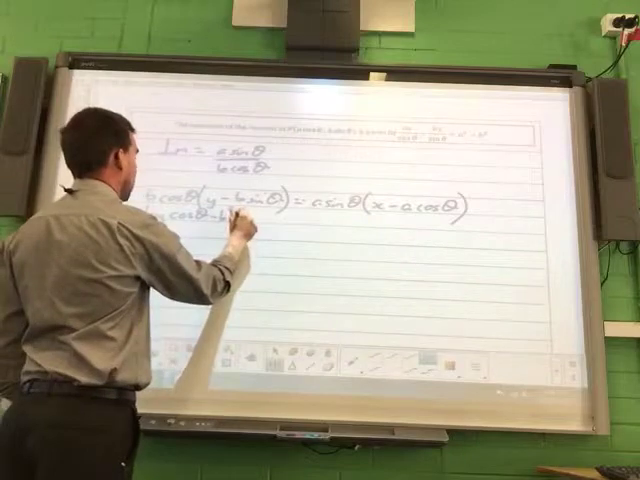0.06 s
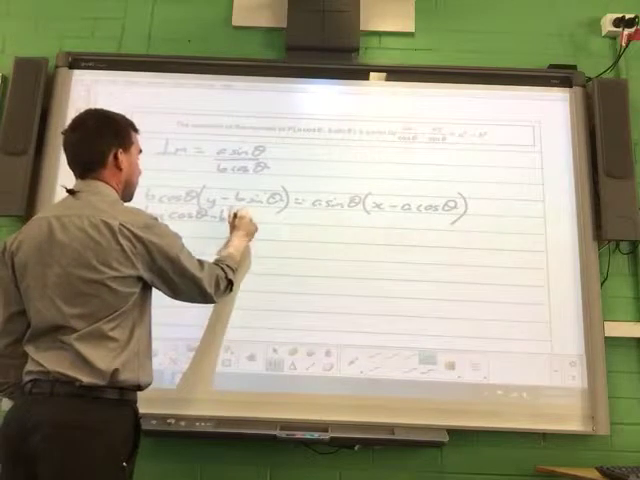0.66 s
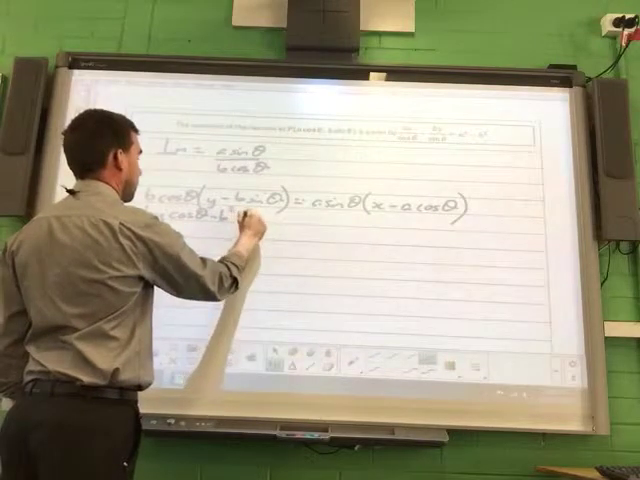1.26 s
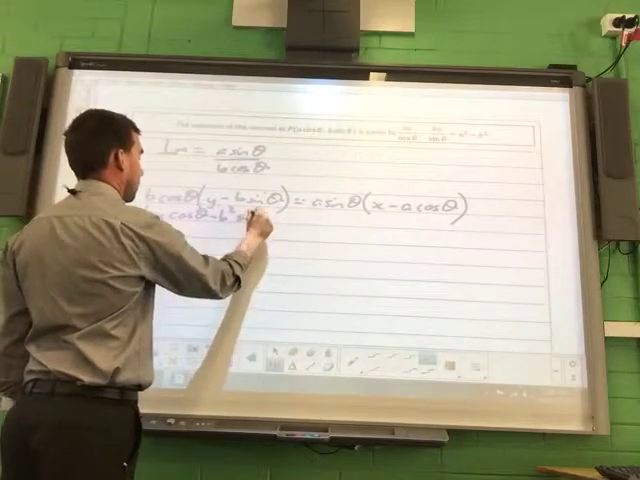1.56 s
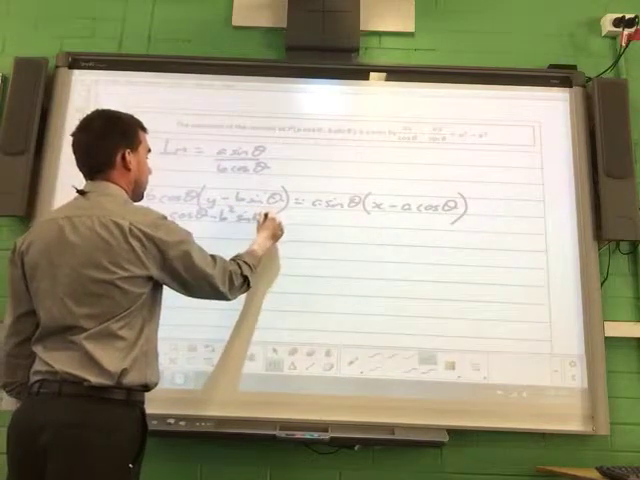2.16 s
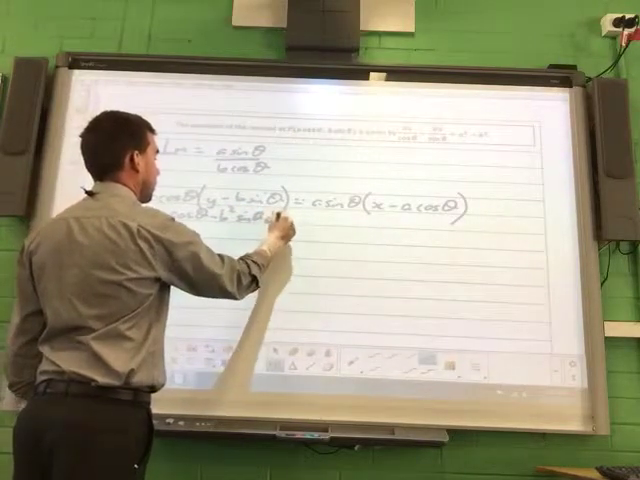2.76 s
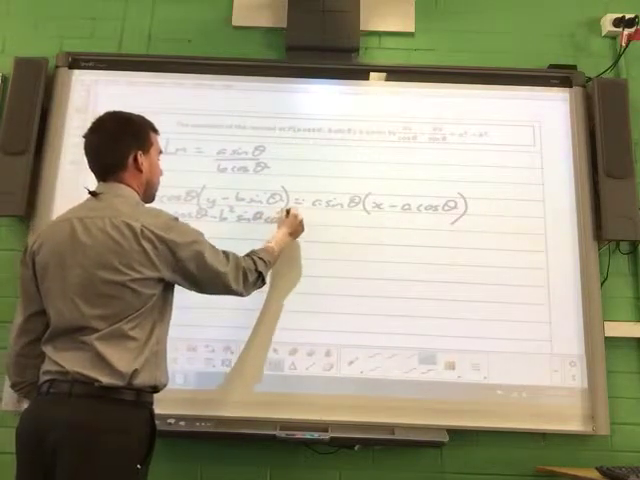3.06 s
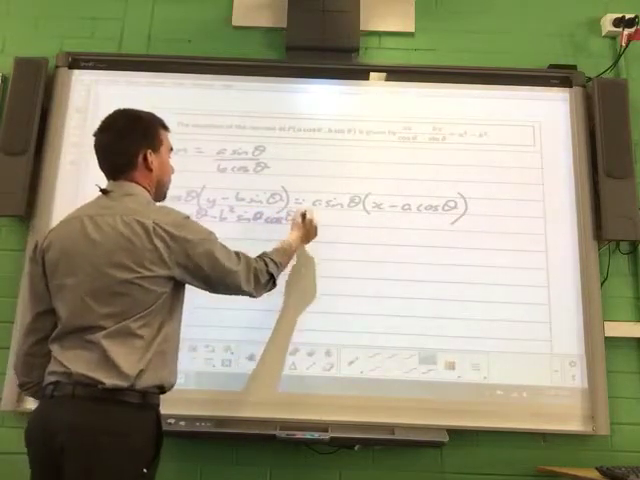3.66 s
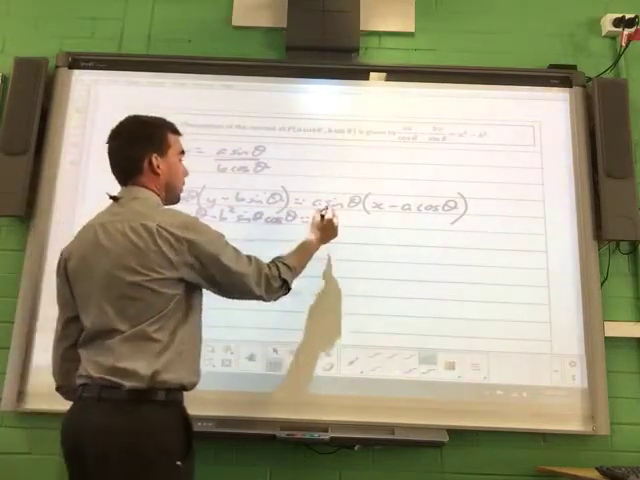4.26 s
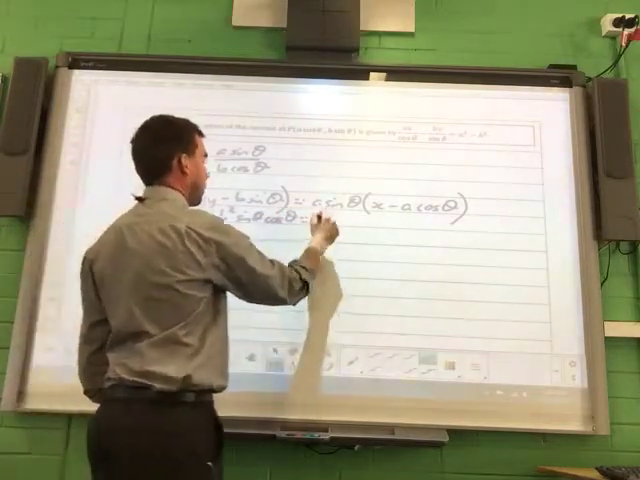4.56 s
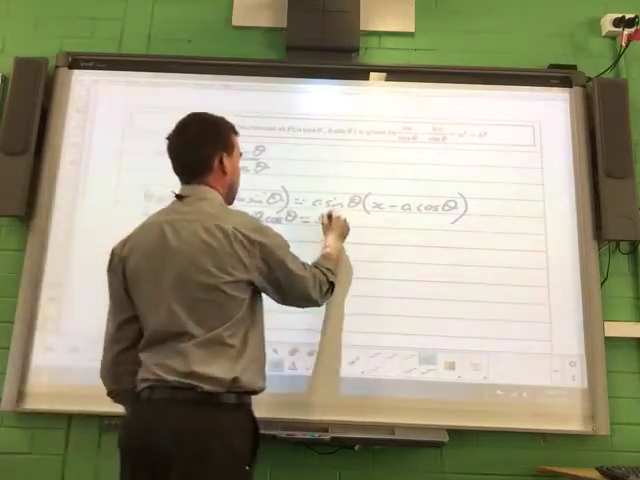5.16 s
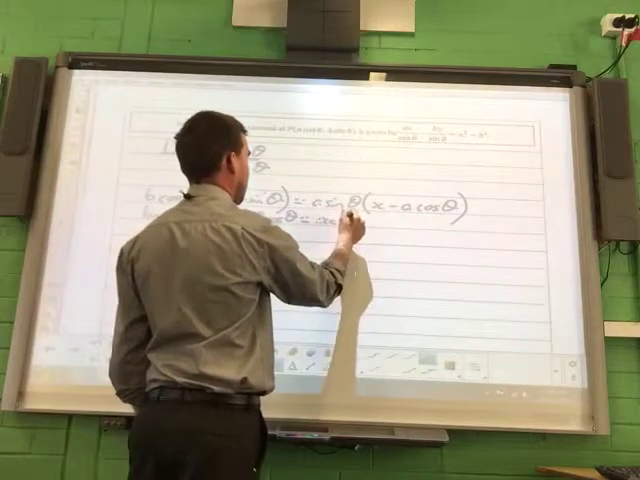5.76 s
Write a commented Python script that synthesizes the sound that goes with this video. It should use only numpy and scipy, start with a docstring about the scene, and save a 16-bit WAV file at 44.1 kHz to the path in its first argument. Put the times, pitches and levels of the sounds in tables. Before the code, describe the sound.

A hard pen knocks irregularly on a hollow whiteboard, with tiny ticks and faint slides, over a soft projector fan.

```python
"""Pen on a hollow whiteboard

A man writes with a hard pen on a large hollow whiteboard in a quiet classroom, a projector fan overhead.
Each touch of the nib knocks the panel: a bending wave spreads, returns from the frame and rings on in
the room. The tip ticks and pings the pen's barrel, then slides faintly over the surface between knocks."""
import sys
import numpy as np
from scipy import signal
from scipy.fft import rfft, irfft, next_fast_len
from scipy.io import wavfile

SR = 44100
rng = np.random.default_rng(int(sys.argv[2]) if len(sys.argv) > 2 else 0)


def generate_wav(sig):
    """Save sig (samples, or channels by samples) to the path in sys.argv[1] as 16-bit PCM at SR."""
    pcm = np.round(np.clip(np.atleast_2d(sig).T, -1, 1) * 32767).astype(np.int16)
    wavfile.write(sys.argv[1], SR, pcm)


N = 255780
SIZE = 49152  # samples in the buffer for one knock
HZ = np.fft.rfftfreq(SIZE, 1 / SR)
AGE = np.arange(SIZE) / SR  # seconds since the touch
BARREL_HZ = 4760

# Fan and room air. Each row: frequency in Hz, relative level in dB.
FAN_COLOUR = [(20, -26), (33, -33), (45, -9.5), (58, 4.5), (80, -13), (115, -2.5), (145, -9), (195, -7),
              (300, -10), (500, -18), (850, -17.5), (1600, -24.5), (4000, -29.5), (6500, -31),
              (10400, -37.5), (12000, -37), (15300, -39.5)]
# Pen-downs. Each row: start in seconds, knock gain in dB, brightness in dB per octave, click gain in dB.
TOUCHES = [(0.7643, -29, -3.5, -86), (1.1345, -25.5, -0.5, -70.5), (1.2838, -30, -5.5, -86),
           (1.4258, -26.5, -6, -73), (1.718, -26, -.5, -72.5), (2.2615, -24.5, -0.5, -76),
           (2.5024, -26, -1.5, -74), (2.8146, -31, -7, -80), (3.2674, -24, -0.5, -77),
           (3.9612, -21.5, 2, -67.5), (4.1509, -21.5, 2, -72), (4.9823, -31.5, -3.5, -75),
           (5.4073, -23, 0.1, -65.5), (5.7041, -26, 0.1, -86)]
# The panel's first push. Each row: frequency in Hz, relative level in dB.
PUSH_COLOUR = [(40.0, -66.5), (105.0, -22), (160.0, 1), (270.0, 4), (390.0, -2.5), (650.0, -6.5),
               (800.0, -20.5), (1020.0, -16.5), (1300.0, -42), (2000.0, -48.5), (3200.0, -64),
               (8000.0, -74)]
# Waves back from the frame. Each row: delay at time zero in ms, drift in ms per second, signed gain.
FRAME_RETURNS = [(5.04, .37, -0.78), (5.52, -0.061, 0.98), (8.27, 0.11, -1.4), (9.42, -0.36, 0.73),
                 (13.19, -0.069, 0.84), (16.79, -0.385, 0.47)]
# The frame's dry rattle. Each row: frequency in Hz, relative level in dB.
RATTLE_COLOUR = [(500, 1.5), (1000, 6.5), (1300, 6.5), (1700, 2.5), (2100, -3), (2600, -3), (3200, -17),
                 (4800, -16), (7000, -31), (9500, -37), (11500, -57), (15000, -59)]
# Ring of panel and frame, plus one low, long-lasting room boom.
# Each row: frequency in Hz, relative level in dB, 60 dB decay in seconds.
RING_MODES = [(95.5, -37, 3.4), (165, -7.5, 0.57), (236.8, -13.5, 0.25), (265.5, -10.5, 0.66),
              (289.2, -14, 0.73), (334, -4, 0.44), (364.5, -7, 0.47), (420, -19.5, 0.32), (445, -5.5, 0.41),
              (520.8, -11.5, 0.19), (548, -16.5, 0.48), (587, -24, 0.78), (625, -16.5, 0.48),
              (653.3, -4, 0.15), (763, -18, 0.26), (861, -9.5, 0.18), (907, -20, 0.37), (966, -34, .38),
              (1015, -28, 0.39), (1555, -26, 0.18), (1830, -39, 0.2)]
# Sound scattered round the room. Each row: frequency in Hz, relative level in dB.
TAIL_COLOUR = [(50, -26.5), (115, -9.5), (160, -6), (220, -4.5), (330, 1.5), (480, -2.5), (650, -5),
               (780, -9), (1020, -15.5), (1200, -22.5), (1800, -26.5), (2600, -35), (3300, -36.5),
               (8500, -52.5), (12000, -64)]
# The room's reverb time. Each row: frequency in Hz, 60 dB decay in seconds.
TAIL_DECAY = [(100, 0.76), (280, 0.76), (600, 0.56), (1000, 0.48), (2000, 0.37), (8000, 0.42)]
# What the panel throws at the far walls. Each row: frequency in Hz, gain in dB.
ECHO_COLOUR = [(100, -10), (200, -1.5), (330, -8), (480, -10.5), (700, -37.5), (1500, -1.5)]
# Slapback off the walls. Each row: delay in seconds, gain in dB.
WALL_ECHOES = [(.042, -9), (.054, -21), (.079, -4)]
# The tip's dry tick and rasp. Each row: frequency in Hz, relative level in dB.
NIB_COLOUR = [(1500, -6.5), (2400, 0), (3300, -1), (4200, 4), (5100, -6), (6200, -2.5), (10000, -31),
              (14000, -32)]
# Letters, each written without lifting the nib. Each row: start in seconds, length in seconds, gain in dB.
LETTER_SLIDES = [(.84, .2, -83), (1.749, .4, -76.5), (2.27, .2, -82), (2.515, .2, -82.5),
                 (2.816, .2, -80.5), (3.3, .4, -75), (4.003, .1, -77), (4.14, .1, -84), (4.998, .2, -77.5),
                 (5.432, .1, -80), (5.721, .1, -78)]
# The nib's hiss on the smooth surface. Each row: frequency in Hz, relative level in dB.
HISS_COLOUR = [(3000, -28), (7000, 3.5), (10400, 1), (12000, 5), (15000, 1.5)]


def amp(db):
    """Decibels to gain."""
    return 10 ** (np.asarray(db) / 20)


def unit(x):
    """Scaled to rms 1."""
    return x / np.sqrt(np.mean(x ** 2) + 1e-20)


def along(points, hz):
    """A curve of (Hz, value) points, read on a log frequency axis."""
    freqs, values = np.transpose(points)
    return np.interp(np.log(hz + 1), np.log(freqs + 1), values)


def noise(colour, size):
    """Noise of rms 1 with the given colour."""
    gains = amp(along(colour, np.fft.rfftfreq(size, 1 / SR)))
    return unit(irfft(rfft(rng.standard_normal(size)) * gains, size))


def causal_eq(db):
    """The minimum-phase response with these gains."""
    cepstrum = irfft(np.log(amp(db)))
    cepstrum[1:SIZE // 2] *= 2
    cepstrum[SIZE // 2 + 1:] = 0
    return np.exp(rfft(cepstrum))


def delay(seconds):
    """The frequency response of a travel time."""
    return np.exp(-2j * np.pi * HZ * seconds)


def swell(rise_s, t60):
    """An envelope that builds up, then dies away."""
    return (1 - np.exp(-(AGE / rise_s) ** 2)) * amp(-60 * AGE / t60)


def add(track, start_s, sound):
    """Mix a sound into the track."""
    part = track[max(round(start_s * SR), 0):][:len(sound)]
    part += sound[:len(part)]


def fan_and_hum(fan_db=-66, hum_hz=96.5, crest_s=0.56, period_s=1.377):
    """The bed: the fan's steady rush and a low, wavering hum that swells and fades."""
    t = np.arange(N) / SR
    waver = 0.82 * noise([(1, -18), (4, 11), (12, -51), (50, -120)], N)
    hum = np.sqrt(2) * np.sin(2 * np.pi * hum_hz * t + waver)
    hum_db = -75.5 + 8.5 * np.cos(2 * np.pi * (t - crest_s) / period_s)
    return amp(fan_db) * noise(FAN_COLOUR, N) + amp(hum_db) * hum


def bending_wave(travel_s=0.0005):
    """Spectrum of the panel's push: highs outrun lows, so it is a short falling chirp."""
    slowness = np.sqrt(1000 / (HZ + 1))  # relative to 1 kHz
    wave = causal_eq(along(PUSH_COLOUR, HZ)) * delay(2 * travel_s * slowness)
    return wave / np.abs(irfft(wave)).max()


def frame_paths(time_s):
    """The direct wave plus its returns from the frame, which shift as the pen moves steadily right."""
    return 1 + sum(gain * delay((ms + drift * time_s) / 1000) for ms, drift, gain in FRAME_RETURNS)


def contact(time_s, db, brightness, tilt_hz=550, boom_hz=230, hollow_hz=700, hard_knock_db=-22.5):
    """EQ of one touch: a shorter contact is brighter, and force and spot set the boom and hollow tone."""
    tilt = brightness * np.log2(1 + np.minimum(HZ / tilt_hz, 5) ** 2) / 2
    boom_db = -1.5 - 0.5 * (db - hard_knock_db)  # harder knocks boom less
    boom = boom_db / (1 + (HZ / boom_hz) ** 4)
    hollow_db = 2.5 - 0.35 * time_s  # fades as the pen nears the middle of the board
    hollow = hollow_db * np.exp(-(2 * np.log2((HZ + 1) / hollow_hz)) ** 2)
    return causal_eq(tilt + boom + hollow)


def mode_ring(spread_db=0.5):
    """The board's modes and one low room mode ring at slightly new strengths for each spot struck."""
    ring = np.zeros(SIZE)
    for hz, db, t60 in RING_MODES:
        envelope = amp(db + spread_db * rng.standard_normal() - 60 * AGE / t60)
        ring += envelope * np.sin(2 * np.pi * (hz * AGE + rng.random()))
    return ring


def room_tail():
    """A diffuse wash in which each frequency dies at its own speed."""
    hz, t, bands = signal.stft(noise(TAIL_COLOUR, SIZE), SR, nperseg=512)
    decay = amp(-60 * t / along(TAIL_DECAY, hz)[:, None])
    return signal.istft(bands * decay, SR, nperseg=512)[1][:SIZE]


def knocks(fresh_share=0.25):
    """Each pen-down sends a wave over the panel, which rattles the frame, rings and fills the room."""
    track, wave, shared_tail = np.zeros(N), bending_wave(), room_tail()
    slapback = causal_eq(along(ECHO_COLOUR, HZ)) * sum(amp(db) * delay(s) for s, db in WALL_ECHOES)
    bloom = 1 - np.exp(-(AGE / 0.016) ** 4)  # the wave must cross the panel a few times before it rings
    for start, db, brightness, _ in TOUCHES:
        push = wave * frame_paths(start) * (1 + slapback)
        # neighbouring spots excite the room much alike
        tail = np.sqrt(1 - fresh_share) * shared_tail + np.sqrt(fresh_share) * room_tail()
        ring = bloom * (amp(-12) * tail + amp(-5) * mode_ring())
        rattle = amp(-14) * noise(RATTLE_COLOUR, SIZE) * swell(rise_s=0.012, t60=0.1)
        knock = irfft(contact(start, db, brightness) * (push + rfft(ring + rattle)))
        add(track, start, amp(db) * knock[:SR])
    return track


def barrel_ring(size, grip_spread, half_width_hz=110):
    """Noise through the pen barrel's narrow resonance, whose pitch shifts a little with the grip."""
    pitch_hz = BARREL_HZ * (1 + grip_spread * rng.standard_normal())
    detune = (np.fft.rfftfreq(size, 1 / SR) - pitch_hz) / half_width_hz
    return unit(irfft(rfft(rng.standard_normal(size)) / (1 + detune ** 2), size))


def nib_clicks():
    """The hard tip ticks as it lands and pings the barrel."""
    track = np.zeros(N)
    usual_db = np.mean([db for *_, db in TOUCHES])
    for start, _, _, db in TOUCHES:
        tick = amp(db + 3) * swell(rise_s=0.00025, t60=0.16) * noise(NIB_COLOUR, SIZE)
        # hard knocks come with a firmer grip, so the ping grows more slowly than the tick
        ping_db = usual_db + 0.66 * (db - usual_db) + 4
        ping = amp(ping_db) * swell(rise_s=0.00054, t60=0.16) * barrel_ring(SIZE, grip_spread=0.011)
        add(track, start, tick + ping)
    return track


def nib_slides(stroke_s=0.103, fast_s=0.084, ease_db_per_s=-6):
    """A letter is a run of even strokes with easing pressure; friction rasps, hisses and rings the pen."""
    track, size = np.zeros(N), SIZE // 4
    t = (np.arange(size) - size / 2) / SR
    speed = np.exp(-(2 * t / fast_s) ** 2)
    for start, length, db in LETTER_SLIDES:
        for middle in np.arange(stroke_s / 2, length, stroke_s):
            grain = unit(amp(2 * noise([(20, 2), (200, -5), (600, -47)], size)))  # fine level flutter
            squeak = amp(-4) * barrel_ring(size, grip_spread=0.022)
            rasp = amp(-3) * noise(NIB_COLOUR, size)
            hiss = amp(-2) * noise(HISS_COLOUR, size)
            pressure = amp(db + ease_db_per_s * middle)
            add(track, start + middle + t[0], pressure * speed * grain * (squeak + rasp + hiss))
    return track


def scene():
    """The mono mix, as heard from a few metres behind the writer."""
    return (knocks() + nib_clicks() + nib_slides() + fan_and_hum())[None]


def record(dry):
    """A brick-wall high cut takes off the very top."""
    size, top_hz = next_fast_len(N + SIZE), 15500
    passband = np.fft.rfftfreq(size, 1 / SR) < top_hz
    return irfft(rfft(dry, size) * passband, size)[:, :N]


dry = scene()
out = record(dry)
generate_wav(out)
```